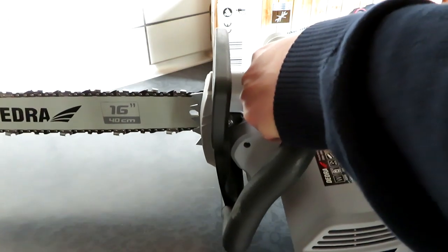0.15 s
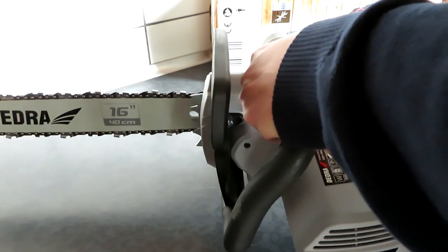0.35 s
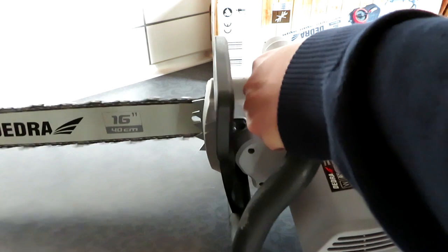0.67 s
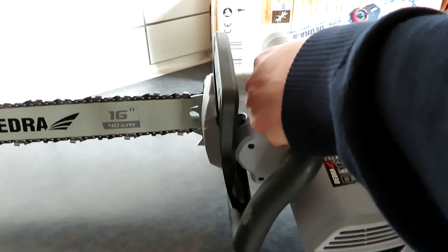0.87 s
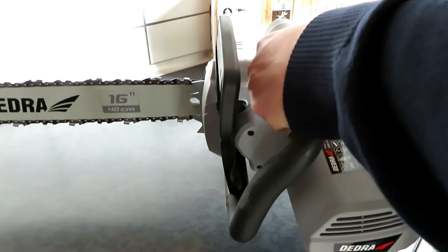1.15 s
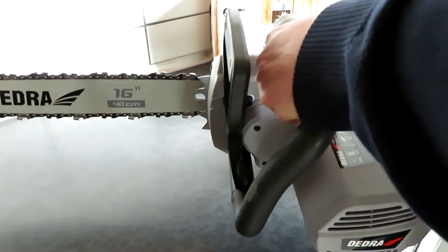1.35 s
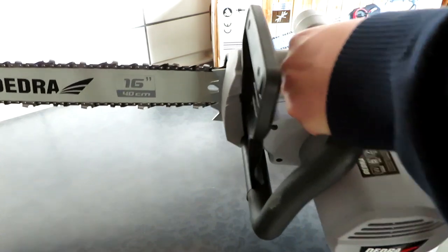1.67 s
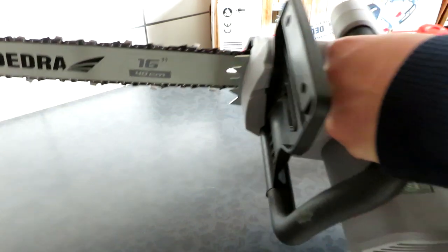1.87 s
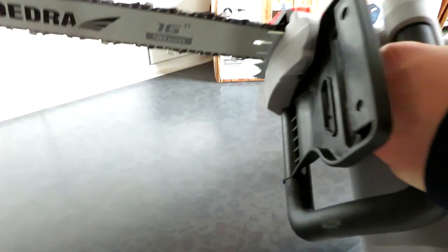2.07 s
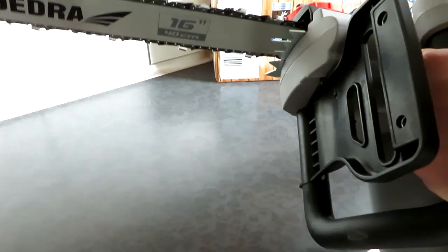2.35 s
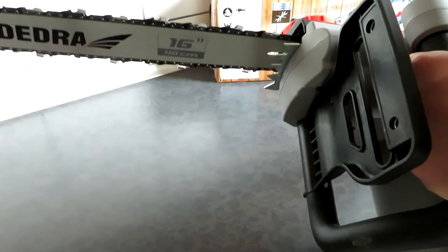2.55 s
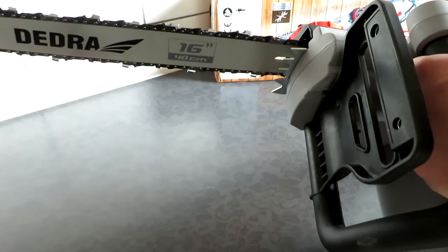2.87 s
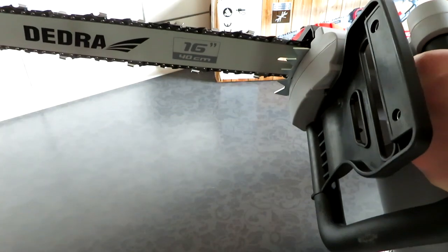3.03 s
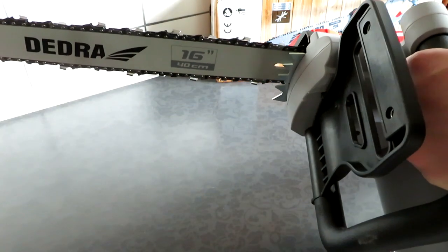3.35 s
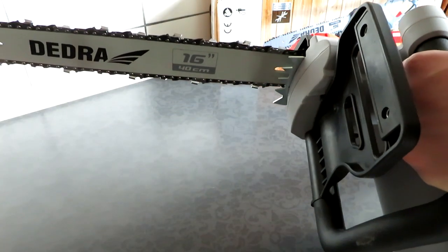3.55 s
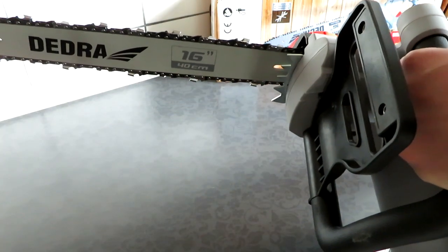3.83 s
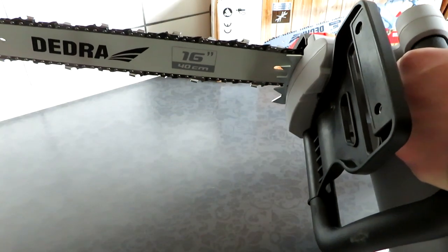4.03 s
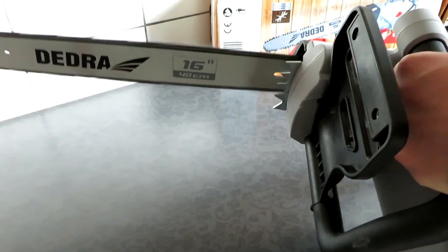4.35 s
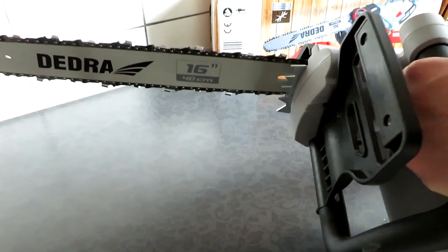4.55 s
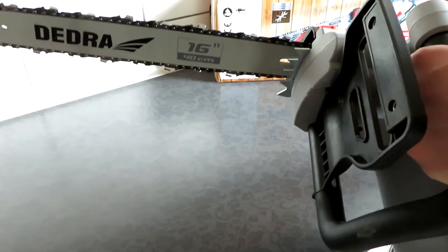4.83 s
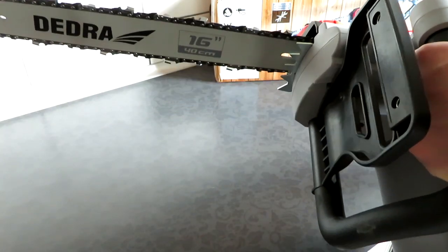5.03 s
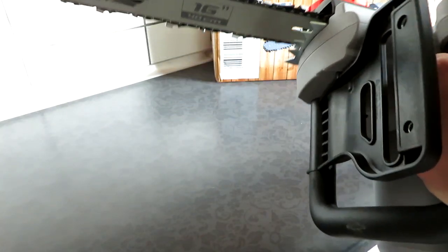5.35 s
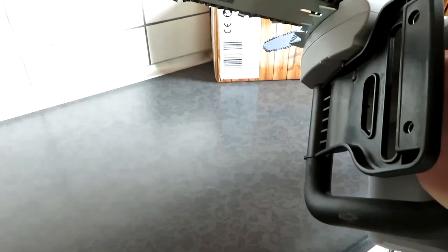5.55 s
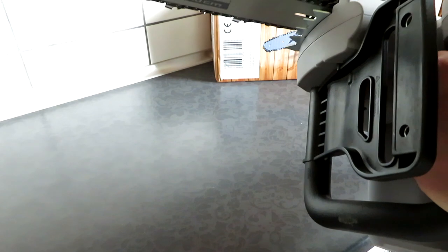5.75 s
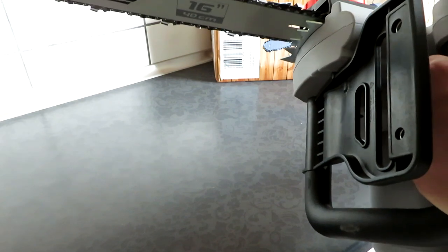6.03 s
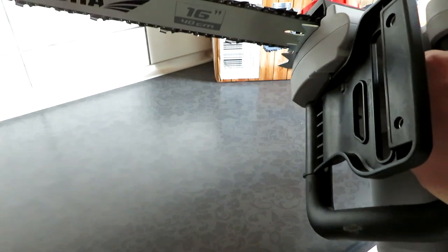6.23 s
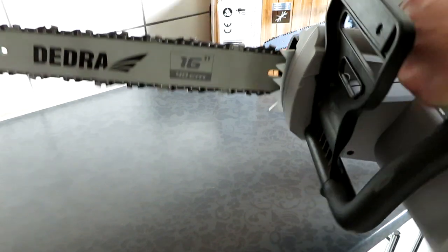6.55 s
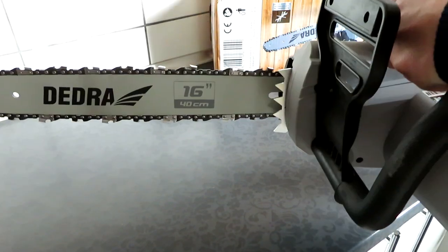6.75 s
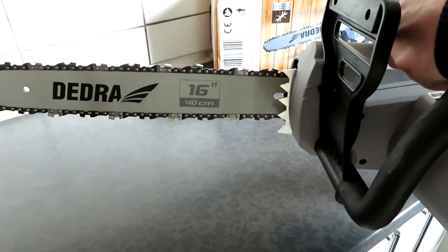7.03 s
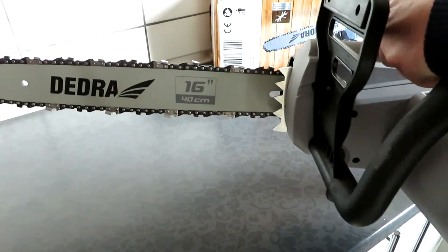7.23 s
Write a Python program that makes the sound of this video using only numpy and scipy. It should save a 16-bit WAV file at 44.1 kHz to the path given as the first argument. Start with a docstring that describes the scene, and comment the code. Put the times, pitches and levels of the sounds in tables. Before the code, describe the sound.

A quiet indoor room tone and light taps on a plastic housing open the scene. An unloaded electric chainsaw jolts into a split-second buzz, then coasts for about two seconds: hiss and whine fall, metallic chain clatter slows and stops. A pause with faint clicks follows. A lever snaps, and the motor kicks again and winds down the same way, ending in soft knocks. Close stereo microphone, short hard wall reflections.

```python
"""A quiet hum and rush of the room come first, then small clicks of a plastic housing being handled.
Close to a stereo microphone in a hard room, an electric chainsaw is blipped twice with no load.
Each time the drive jolts, the motor buzzes under power, then rotor, gears and chain coast to a clattering stop.
One rotor speed curve drives link blows, gear tones, air hiss and drone; knocks are short bursts into resonances.
Decaying noise stands for the walls; late in the second run a low rumble sits on the microphone."""
import sys
import numpy as np
from scipy import signal
from scipy.fft import rfft, irfft, next_fast_len
from scipy.io import wavfile
from scipy.ndimage import uniform_filter1d, map_coordinates

SR = 44100
rng = np.random.default_rng(int(sys.argv[2]) if len(sys.argv) > 2 else 0)


def to_wav(s):
    """Save 16-bit WAV."""
    ch = np.atleast_2d(s).T  # columns
    pcm = np.round(np.clip(ch, -1, 1) * 32767)  # PCM
    wavfile.write(sys.argv[1], SR, pcm.astype(np.int16))


N = 325899  # samples

# All levels are relative: each source is trimmed again where it is mixed.
# Room rush, spectrum: [f/Hz, level/dB per Hz]
ROOM_RUSH = [(15, -28), (30, -20.5), (45, -25), (85, -21.5), (130, -10.5), (166, -18), (232, -12.5),
             (315, -12), (362, -14.5), (478, -14.5), (600, -19), (958, -24), (1450, -30.5), (4000, -39.5),
             (15500, -54.5)]
# Wavering room hums: [f/Hz, level/dB]
ROOM_HUMS = [(30.6, -6), (60.6, -13.5), (99.1, -6.5), (132.1, -3.5), (395, -7), (480, -3)]
# The room tone sinks and recovers after a trigger pull: [t since the pull/s, level change/dB]
ROOM_SINKS = [(0, 0), (.25, -6), (.6, -11.5), (.95, -8), (1.5, -8.5), (1.85, -5.5), (2.45, -.5), (2.8, 0)]
# Left-right likeness of the room tone: [f/Hz, correlation]
ROOM_ALIKE = [(60, 0.82), (130, 0.69), (290, -0.54), (640, -0.64), (1410, -0.57), (3100, -0.39),
              (6820, -0.089), (15000, -0.11)]
# Left-right balance of the room tone: [f/Hz, left over right/dB]
ROOM_LEAN = [(60, -3.5), (380, 3), (2380, 0.5), (15000, -1)]
ROOM_DB = -40  # room tone at rest

# Knocks and clicks of housing and chain:
# [t/s, level around 1.3-2.4 kHz/dB, part below/dB, part above/dB, left over right/dB]
KNOCKS = [(0.2864, -33, 6, 0, -1), (0.3042, -19.5, 6.5, -14, 1), (0.3147, -33, 2, 0, -1),
          (0.4349, -32, 5, -12, -5), (0.5224, -22, 5, -8, 0), (0.532, -16.5, 2, -12, 0),
          (0.5414, -32, -6, 14, -1.5), (0.57, -20, 1, 6, -10), (0.5904, -10, 3, 0, -2),
          (0.5966, -4.5, -2, 1, 4), (0.7562, -12, 2, -8, -1), (2.1944, -14, -12, -13, 0),
          (2.2394, -13, 5, -18, 4), (2.3144, -21, 5, -14, 0), (2.5282, -40, 6, 11, -5),
          (2.5616, -16, 4, -9, 0), (3.0285, -35, -5, -11, -2.5), (3.049, -24, 2.5, 0, -4),
          (3.0625, -27.5, -2, -15, 0), (3.1065, -35, -22, -13, 0), (4.132, -7, -5, -12, -3),
          (4.1861, -27, 1, -5, 2), (4.3654, -13, 4, -4, -6), (4.373, -2, 5, -6, -1),
          (4.5521, -12, -3, -8, -5), (6.1073, -21, 5, -5, -8), (6.1757, -17.5, -13, -14, -6),
          (6.2992, -27, 5, -10, -6), (6.4262, -35, -3, 4, -7), (6.4485, -15.5, 5, -7, 2),
          (7.0854, -36, -13, -4, -1.5), (7.1144, -34, -4, -5, -8), (7.1666, -36, 3, -5, 1)]
KNOCK_T60_S, SOFTER_S_PER_DB = .042, .0011  # decay of a -10 dB knock; weaker ones last longer
KNOCK_TOP_DB = -10.5  # share of the treble, from about 3 kHz, against the part above
# Resonances of the plastic housing: [f/Hz, width/Hz, level/dB]
HOUSING = [(295, 56, -22), (576, 24, -4.5), (735, 110, -8.5), (905, 69, 1.5), (1026, 66, -1),
           (1191, 39.5, 4), (1381, 112, -1.5), (1658, 32, 3.5), (2037, 77, -6)]
# Resonances of bar and chain: [f/Hz, width/Hz, level/dB]
STEEL = [(2600, 310, -5), (3043, 71, 5.5), (3224, 62, 1), (3308, 22, 6), (3648, 118, 1.5),
         (4470, 1450, -19.5), (5510, 300, -22.5), (8560, 600, -29.5)]
# Decay of the hard walls: [f/Hz, t60/s]
WALLS = [(200, 0.25), (1500, 0.34), (10000, 0.18)]

# Trigger pulls: [pressed t/s, released t/s, rotor speed at release/(turns/s), friction/(turns/s per s)]
PULLS = [(.595, .746, 270.4, 140.2), (4.37, 4.535, 283.7, 137.3)]
SPIN_UP_S = .1  # time constant of the motor
AIR_DRAG = 6.04e-4  # slowing in turns/s per s, per (turn/s) squared
# Loudness against rotor speed:
# [speed/(turns/s), rattle/dB, ring of bar and chain/dB, cooling air and brush hiss/dB, housing drone/dB]
BY_SPEED = [(0, -120, -120, -120, -120), (1, -57, -56, -76, -64), (8, -34, -48, -76, -44),
            (16, -23, -34, -68, -45), (35, -24, -28, -60, -47), (55, -22.5, -26, -47, -42),
            (75, -24.5, -28, -38.5, -42), (110, -24.5, -31, -35, -37), (150, -25.5, -33, -35.5, -32),
            (200, -28.5, -35.5, -34.5, -32), (260, -31, -35.5, -32, -35.5), (285, -32, -37, -32, -33),
            (300, -28, -37, -27.5, -28)]
JOLT_LIFTS_DB = (25, 26, 1, 17)  # lift of rattle, ring, air and drone at a start
JOLT_S, JOLT_SHARES = .014, (1, .7)  # its time constant, and its share at each start
SLACK_S = .003  # from trigger to jolt
# Lurches of the slowing chain: [t/s, lift/dB]
LURCHES = [(1.56, 2.5), (2.148, 4), (2.344, 5), (2.44, 4), (5.53, 2.5), (5.81, 3), (6.02, 4), (6.115, 4),
           (6.22, 4), (6.3, 6)]
LURCH_S = .02  # from the peak of a lurch until its lift has dropped to 1/e
LINKS_PER_TURN = 1.15  # drive links meeting the sprocket per rotor turn
# Strong shaft orders: unbalance, two fan tones, pinion teeth and their octave, commutator: [times per turn]
STRONG_ORDERS = (1, 5, 7, 9, 18, 38)
# Their levels: [loudest level/dB, at speed/(turns/s), loss per octave away/dB, flutter/dB]
STRONG_LEVELS = [(-21, 270, 7, 1.5), (-38.5, 160, 1, 3.5), (-37, 140, 11, 4), (-31.5, 130, 12, 3),
                 (-34, 60, 5, 3.5), (-46, 230, 1, 4)]
# How well the casing gives off a gliding tone; the saw is held at another angle the second time:
# [f/Hz, first run/dB, second run/dB]
RADIATION = [(75, -32, -32), (100, -20, -20), (300, -20, -19), (450, -3, -2), (650, -2, -2), (880, 4, 3),
             (1080, -1, 1), (1220, 8, 4), (1380, 6, 5), (1650, 0, 1), (2000, -4, 1), (2200, -3, -5),
             (2450, 8, -3), (3050, 6, 6), (3600, -5, 4), (4000, -6, -6), (4700, -6, -4), (5500, -3, 3),
             (7800, -1, -4), (8600, 9, 9), (9600, 2, 3), (10300, 3, -5)]
TURNED_S = 3  # the angle changes here, between the runs
# Weaker shaft orders: [times per turn, level against the rattle/dB]
WEAK_ORDERS = [(3, -11.5), (10, -9), (11, -13), (13, -17.5), (22, -21.5)]
WHEEL_PER_TURN = .19  # turns of the big gear wheel per rotor turn
# Cooling air and brush hiss, spectrum: [f/Hz, level/dB per Hz]
AIR = [(120, -37.5), (200, -16.5), (231, -17), (333, -17), (414, 0.5), (506, -4), (1190, -2), (1540, -13),
       (1980, -3.5), (3610, -7), (7090, -17.5), (8820, -17.5), (15500, -24)]
# Buzz under power, spectrum: [f/Hz, level/dB per Hz]
SPARKS = [(88, -57.5), (150, -30), (285, 2.5), (373, -10.5), (583, 1), (1200, -4.5), (1540, -11.5),
          (1910, -24.5), (5330, -15.5), (8330, -4.5), (15500, -14.5)]
# Left-right likeness of the saw: [f/Hz, correlation]
SAW_ALIKE = [(60, .95), (200, 0.9), (550, 0.95), (1650, 0.68), (4970, 0.86), (9000, 0.26), (15000, 0.05)]
# Left-right balance of the saw: [f/Hz, left over right/dB]
SAW_LEAN = [(60, -1.5), (150, 2.5), (380, 2.5), (950, 2), (2380, -2.5), (5980, 0.5), (15000, -0.5)]

# The drive takes up or drops its slack: [t/s, level/dB, extra for modes under 400 Hz/dB]
JOLTS = [(0.5963, -3.5, -3.5), (2.562, -25.5, -7), (4.3721, -10.5, 5), (6.449, -23.5, -20)]
# Modes of the whole saw as it thuds: [f/Hz, level/dB, t60/s]
FRAME = [(74.3, -16.5, 0.066), (320, -12.5, 0.18), (601, -3, 0.067), (1045, -11, 0.021),
         (1362, -0.5, 0.029)]
# A plastic lever snaps over: [t/s, level/dB]
LEVER_SNAP = (4.132, -18)
# Modes of the lever: [f/Hz, level/dB, t60/s]
LEVER = [(1660, -1, 0.057), (1837, 2.5, .06), (2790, -5, 0.037), (4600, -13, .03)]
# Low rumble on the microphone, silent outside these times: [t/s, level/dB]
RUMBLE = [(5.42, -67), (5.508, -37), (5.774, -42.5), (5.852, -61)]
# The bar sings after the last link drops: [t/s, level/dB]
BAR_RING = (6.47, -56.5)
TOP_HZ = 15650  # band limit


def amp(db):
    """Amplitude factor of a level in dB."""
    return 10 ** (np.asarray(db) / 20)


def unit(x):
    """x scaled to rms 1."""
    return x / np.sqrt(np.mean(x ** 2) + 1e-20)


def along(points, hz):
    """Values between (Hz, value) points on a log axis."""
    f, v = np.transpose(points)
    return np.interp(np.log(hz + 1), np.log(f + 1), v)


def wobble(rate):
    """A smooth random curve, rate knots a second."""
    coarse = np.arange(0, N + 64, 64)
    knots = rng.standard_normal(int(N * rate / SR) + 4)
    smooth = map_coordinates(knots, [coarse * rate / SR])
    return np.interp(np.arange(N), coarse, smooth)


def filtered(x, response):
    """x times a complex response of frequency."""
    m = next_fast_len(N + SR // 8, real=True)
    return irfft(rfft(x, m) * response(np.fft.rfftfreq(m, 1 / SR)), m)[..., :N]


def modes(table):
    """Causal response of a set of resonances with alternating sign."""
    def response(f):
        total = 0
        for k, (centre, width, db) in enumerate(table):
            damping = 1j * f * width
            total = total + (-1) ** k * amp(db) * damping / (centre ** 2 - f * f + damping + 1e-9)
        return total
    return response


def noise(spectrum):
    """A pair of unrelated noises of rms 1, coloured by (Hz, dB per Hz) points."""
    m = next_fast_len(N, real=True)
    hz = np.fft.rfftfreq(m, 1 / SR)
    real, imag = rng.standard_normal((2, 2, len(hz)))
    return unit(irfft((real + 1j * imag) * amp(along(spectrum, hz)), m)[:, :N])


def stereo(pair, alike, lean):
    """Two unrelated signals, as mid and side, mixed to a likeness and balance that depend on frequency."""
    m = next_fast_len(N + SR // 8, real=True)
    hz = np.fft.rfftfreq(m, 1 / SR)
    turn = np.arccos(np.clip(along(alike, hz), -1, 1)) / 2
    mid, side = rfft(pair, m) * np.array([np.cos(turn), np.sin(turn)])
    balance = amp(np.outer([.5, -.5], along(lean, hz)))
    return irfft(np.array([mid + side, mid - side]) * balance, m)[:, :N]


def room_tone():
    """Broad rush with a few hums unsteady in level and phase; it sinks after each trigger pull."""
    t = np.arange(N) / SR
    hums = sum(amp(db + 2.8 * wobble(13)) * np.sin(2 * np.pi * hz * t + 1.1 * wobble(6))
               for hz, db in ROOM_HUMS)
    tone = noise(ROOM_RUSH) + amp(-2) * hums * [[1], [.3]]
    since, change_db = np.transpose(ROOM_SINKS)
    sink_db = sum(np.interp(t - on, since, change_db) for on, *_ in PULLS)
    return amp(ROOM_DB + sink_db + 0.38 * wobble(6)) * stereo(tone, ROOM_ALIKE, ROOM_LEAN)


def knocks():
    """Each knock is a short noise burst into housing and steel, with its own share of four ranges."""
    t = np.arange(8192) / SR
    f = np.fft.rfftfreq(len(t), 1 / SR)

    def below(hz):
        return 1 / (1 + 1.4j * f / hz - (f / hz) ** 2) ** 2

    def above(hz):
        return (-(f / hz) ** 2) ** 2 * below(hz)

    body = modes(HOUSING)(f) + amp(-11) * modes(STEEL)(f) + 0.31
    bands = np.array([amp(14.5) * above(1420) * below(2900) * body,
                      amp(11) * above(440) * below(1600) * body,
                      amp(11.5) * above(2600) * below(3110) * body,
                      amp(3.0) * above(3000) * below(6700)])
    out = np.zeros((2, N))
    for s, db, low_db, upper_db, pan_db in KNOCKS:
        t60 = KNOCK_T60_S - SOFTER_S_PER_DB * (db + 10)
        grain = rng.standard_normal(len(t)) + 0.37 * rng.standard_normal((2, len(t)))
        burst = amp(-60 * t / np.clip(t60, .005, .15)) * grain
        # long knocks are soft ones and rise slowly
        burst *= 1 - np.exp(-t / (0.00034 * (t60 / 0.061) ** 3))
        colour = amp(db + np.array([0, low_db, upper_db, upper_db + KNOCK_TOP_DB])) @ bands
        start = round(s * SR)
        out[:, start:start + len(t)] += amp([[pan_db / 2], [-pan_db / 2]]) * irfft(rfft(burst) * colour)
    return out


def walls(x):
    """Early and late answer of the hard room: noise whose every frequency dies at its own speed."""
    hz, t, z = signal.stft(rng.standard_normal((2, SR // 2)), SR, nperseg=256)
    decay = amp(-60 * t / along(WALLS, hz)[:, None])
    tail = signal.istft(z * decay, SR, nperseg=256)[1]
    tail = tail / np.linalg.norm(tail[0])
    delayed = np.pad(x, ((0, 0), (300, 0)))  # samples of extra path by way of the walls
    return signal.fftconvolve(delayed, tail, axes=1)[:, :N]


def rotor():
    """Turns per second: a quick spin-up, then friction and air drag brake the coasting rotor."""
    t, speed = np.arange(N) / SR, np.zeros(N)
    for on, off, top, friction in PULLS:
        rise = 1 - np.exp(-np.clip(t - on, 0, None) / SPIN_UP_S)
        rise = top * rise / (1 - np.exp((on - off) / SPIN_UP_S))
        even = np.sqrt(friction / AIR_DRAG)  # speed at which both brakes are equal
        angle = np.arctan(top / even) - friction / even * (t - off)
        speed += np.where(t < off, rise, even * np.tan(np.clip(angle, 0, 1)))
    return speed


def loudness(speed):
    """dB of rattle, ring, air and drone: set by speed, lifted by the start and by lurches."""
    t = np.arange(N) / SR
    at, *levels = np.transpose(BY_SPEED)
    jolt = 0
    for (on, *_), share in zip(PULLS, JOLT_SHARES):
        since = t - on - SLACK_S
        jolt = jolt + share * (since > 0) * np.exp(-np.abs(since) / JOLT_S)
    lurch_db = sum(db * np.exp(-((t - s) / LURCH_S) ** 2) for s, db in LURCHES)
    # under power all layers are driven hard
    powered = sum((t > on) * (t < off - .008) for on, off, *_ in PULLS)
    drive = np.where(powered, at[-1], speed)
    return [np.interp(drive, at, level) + lift_db * jolt + lurch_db
            for level, lift_db in zip(levels, JOLT_LIFTS_DB)]


def power_buzz():
    """Brush sparks while the trigger is held: noise pulsing at 100 Hz, with a faint 100 Hz hum."""
    t = np.arange(N) / SR
    on = sum(np.clip((t - a) / 0.04, 0, 1) * np.clip((b - t) / .012, 0, 1) for a, b, *_ in PULLS)
    mains = np.sin(2 * np.pi * 100 * t)
    sparks = amp(-19) * (1 + 0.21 * mains) * noise(SPARKS)
    return on * (sparks + amp(-46) * mains * [[1], [0]])


def patchy(depth_db):
    """A pair of noises with patches of random gain in time and frequency."""
    z = signal.stft(rng.standard_normal((2, N)), nperseg=256)[2]
    field = uniform_filter1d(rng.standard_normal(z.shape[1:]), size=2, axis=0)
    field = uniform_filter1d(field, size=6, axis=1)
    return signal.istft(z * amp(depth_db * unit(field)), nperseg=256)[1][:, :N]


def rattle_and_ring(speed, turns):
    """Link blows and the rotor's uneven turn shake loose parts, ringing the housing and the steel."""
    # each link strikes at its own strength and shakes the housing for some ms
    links = np.flatnonzero(np.diff(np.floor(LINKS_PER_TURN * turns)))
    blows = np.zeros(N)
    blows[links] = amp(3 * rng.standard_normal(len(links)))
    fade = np.exp(-1 / (.005 * SR))
    shake = signal.lfilter([1], [1, -2 * fade, fade ** 2], blows)
    shake = shake / np.sqrt(np.abs(uniform_filter1d(shake ** 2, SR // 8)) + 1e-9)
    shake = .8 + shake * np.clip(speed / 50, 0, 1)  # a creeping chain only drags
    # loose parts favour now one resonance, now another
    chatter = shake * patchy(depth_db=2)
    # the rotor repeats one uneven pattern of knocks every turn: many shaft orders at once
    pattern = unit(irfft(np.exp(2j * np.pi * rng.random(41)), 512))
    every_turn = pattern[(turns % 1 * len(pattern)).astype(int)] * np.sqrt(np.clip(speed / 200, 0, 1))
    chatter[0] += 0.52 * amp(3.3 * wobble(25)) * every_turn
    return unit(filtered(chatter, modes(HOUSING))), unit(filtered(chatter, modes(STEEL)))


def shaft_tone(order, turns, waver):
    """A sine tied to the rotor angle, its phase wandering by about waver radians."""
    return np.sqrt(2) * np.sin(2 * np.pi * order * turns + waver * wobble(30))


def strong_tones(speed, turns):
    """Unbalance, fan, pinion and commutator glide down while coasting, coloured by the casing."""
    hz, first, second = np.transpose(RADIATION)
    first_run = np.arange(N) < TURNED_S * SR
    total = 0
    for order, (loudest_db, best, loss_db, flutter_db) in zip(STRONG_ORDERS, STRONG_LEVELS):
        f = order * speed
        radiated_db = np.where(first_run, along(np.c_[hz, first], f), along(np.c_[hz, second], f))
        octaves_away = np.abs(np.log2(speed / best + 1e-4))
        db = loudest_db - loss_db * octaves_away + flutter_db * wobble(30) + radiated_db
        total = total + amp(db) * shaft_tone(order, turns, waver=min(.45, .15 * order))
    coasting = np.gradient(speed) < 0
    return coasting * total


def weak_tones(speed, turns):
    """Weak shaft orders swell where they cross a resonance of housing or steel."""
    grid = np.arange(5000)  # Hz
    resonance = np.abs(modes(HOUSING + STEEL)(grid))
    return sum(amp(db + 2.8 * wobble(18)) * np.interp(order * speed, grid, resonance)
               * shaft_tone(order, turns, waver=0.99) for order, db in WEAK_ORDERS)


def air_hiss(speed):
    """Cooling air and brush hiss; slower air loses its top first."""
    air = noise(AIR)
    top = filtered(air, lambda hz: 1 / (1 + (9000 / (hz + 1)) ** 4))
    lost = 1 - np.clip(speed / 230, 0, 1) ** 1.06
    return amp(1.0 * wobble(60)) * (air - top * lost)


def saw():
    """Buzz under power, chain rattle, gear tones, air hiss and drone around one rotor speed."""
    speed = rotor()
    turns = np.cumsum(speed) / SR
    rattle_db, ring_db, air_db, drone_db = loudness(speed)
    rattle, ring = rattle_and_ring(speed, turns)
    drone = noise([(150, -31.5), (270, -3), (450, -3), (700, 2), (1500, -46)])
    noisy = power_buzz() + amp(rattle_db - 3) * rattle + amp(ring_db - 2.0) * ring
    noisy = noisy + amp(air_db + 7.5) * air_hiss(speed) + amp(drone_db - 2.5) * drone
    tones = amp(rattle_db + 5.5) * weak_tones(speed, turns) + amp(1.5) * strong_tones(speed, turns)
    runout = 1 + 0.33 * np.sin(2 * np.pi * WHEEL_PER_TURN * turns)  # the wheel is a little off centre
    return stereo(noisy + runout * tones * [[1], [.3]], SAW_ALIKE, SAW_LEAN)


def struck(table, s, db, low_db=0):
    """Decaying sines of one blow at s seconds; low_db is added to the modes under 400 Hz."""
    t = np.arange(8192) / SR
    out = np.zeros(N)
    start = round(s * SR)
    for hz, level, t60 in table:
        decay = amp(db + level + low_db * (hz < 400) - 60 * t / t60)
        out[start:start + len(t)] += decay * np.sin(2 * np.pi * hz * t)
    return out


def drive_jolts():
    """The whole saw thuds as the drive takes up or drops its slack."""
    return sum(struck(FRAME, s, db, low_db) for s, db, low_db in JOLTS)


def lever_snap():
    """A plastic lever snaps over and rings briefly in its own modes."""
    return struck(LEVER, *LEVER_SNAP)


def rumble():
    """Lumpy low noise on the microphone."""
    low = noise([(15, -19), (50, 1), (100, -6), (200, -29), (500, -55.5)])
    s, db = np.transpose(RUMBLE)
    level_db = np.interp(np.arange(N) / SR, s, db, left=-120, right=-120)
    return amp(level_db) * (low[0] + .3 * low)


def bar_ring():
    """The bar sings at 3200 Hz, swelling and fading unevenly."""
    t = np.arange(8192) / SR
    s, db = BAR_RING
    swell = np.sin(np.pi * t / t[-1]).clip(0) ** 0.88 * amp(3.6 * wobble(43)[:len(t)])
    out = np.zeros(N)
    start = round(s * SR)
    out[start:start + len(t)] = amp(db) * swell * np.sin(2 * np.pi * 3200 * t)
    return out


def scene():
    """Saw and knocks close by, their answer from the walls, room tone and rumble."""
    hits = knocks() + drive_jolts() + lever_snap() + bar_ring()
    machine = saw()
    reflected = walls(amp(-10) * hits + amp(-8.5) * machine)
    return room_tone() + hits + machine + reflected + rumble()


def record(dry):
    """The loudest peaks clip softly; nothing passes above the band limit."""
    clipped = dry / (1 + np.abs(dry / 1.1) ** 6) ** (1 / 6)
    return filtered(clipped, lambda hz: hz < TOP_HZ)


dry = scene()
out = record(dry)
to_wav(out)
```